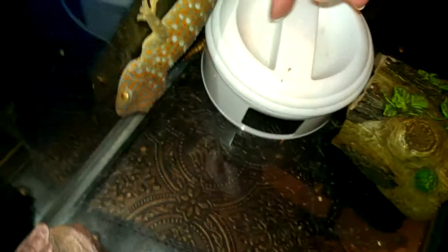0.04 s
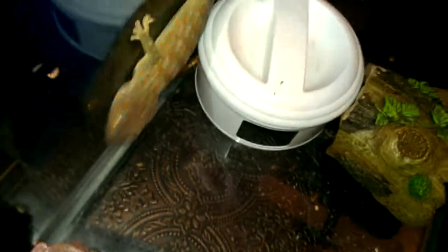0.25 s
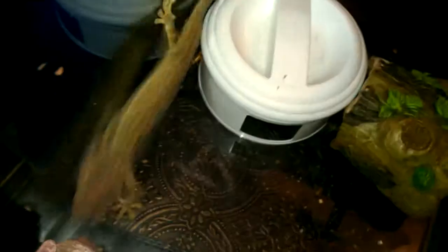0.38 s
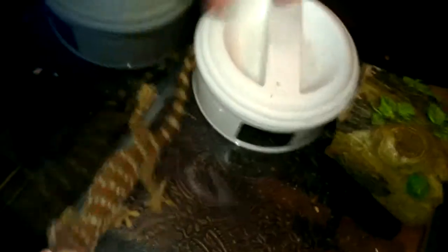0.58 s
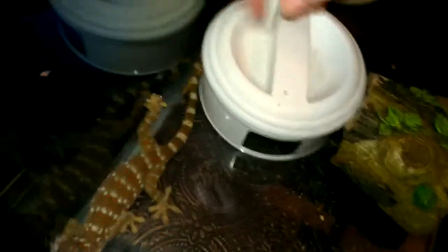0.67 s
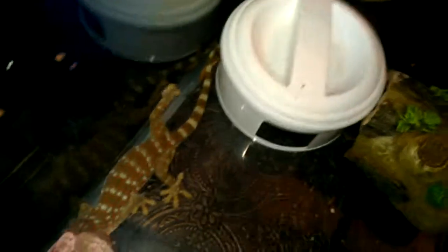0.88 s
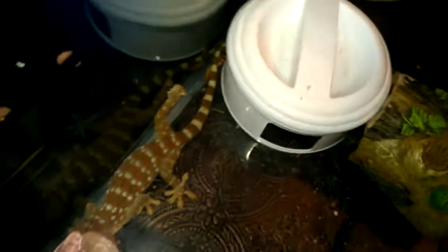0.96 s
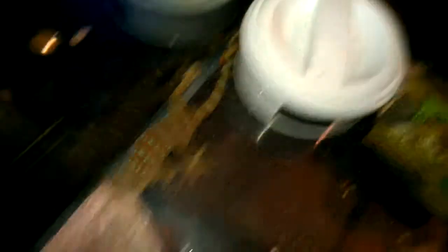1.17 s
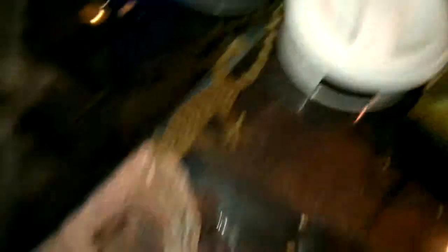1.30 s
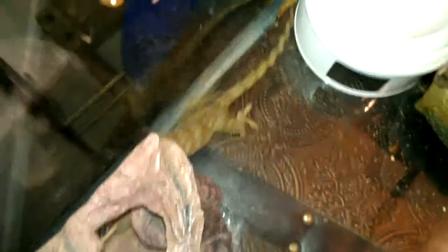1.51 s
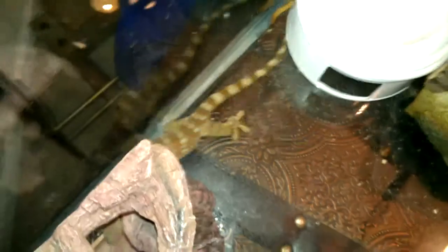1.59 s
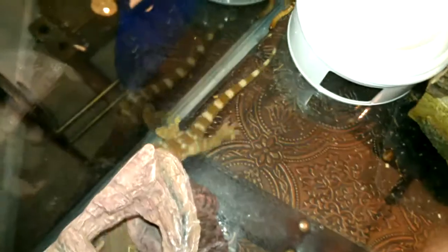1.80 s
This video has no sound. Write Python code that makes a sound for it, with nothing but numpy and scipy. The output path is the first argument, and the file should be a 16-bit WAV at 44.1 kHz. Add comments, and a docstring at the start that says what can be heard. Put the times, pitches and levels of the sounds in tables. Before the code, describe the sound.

Sudden close thumps and patter come from a gecko dashing through a glass tank, making the panels ring briefly with a deep boom. Its claws click, then it shuffles and taps softly over a faint indoor hum.

```python
"""A gecko leaps down inside a glass tank and scrambles along its floor, close to the microphone.
After a faint rumble, its landings make the panels thud and ring, and the tank sways with a deep boom.
Skin rustles as it slides, and claws snap against hard surfaces: both are shaped bursts of noise.
A few light taps follow, over the faint air and electrical hum of a quiet room."""
import sys
import numpy as np
from scipy import signal
from scipy.io import wavfile

SR = 44100
rng = np.random.default_rng(int(sys.argv[2]) if len(sys.argv) > 2 else 0)


def to_wav(sig):
    """Store sig (one row per channel, or 1-D mono) as 16-bit WAV at the path in sys.argv[1].

    Samples outside -1..1 are clipped; the rate is SR.
    """
    pcm = np.clip(np.atleast_2d(sig), -1, 1) * 32767
    pcm = np.round(pcm).astype(np.int16)
    wavfile.write(sys.argv[1], SR, pcm.T)  # frames by channels


N = 81585
TIME = np.arange(N) / SR

# Low thumps: a faint opening rumble, the gecko's landings, then a light tap. Each row: start in seconds,
# ring strength in dB, push length in ms, favoured ring pitch in Hz, thud level in dB, thud pitch in Hz,
# thud fade in seconds, share by which the thud starts too high, boom level in dB, thud pan in dB.
# Throughout, a "fade" is the time to drop by 60 dB, and "pan" is how much louder left is than right.
LOW_THUMPS = [(0.039, -90, 2.0, 169, -56, 165, 0.083, 0.22, -56, 4),
              (0.243, -26, 1.09, 730, -20.5, 178.5, 0.18, 0.45, -28.5, -2),
              (0.2602, -22.5, 1.8, 270, -42, 177, .09, 0.37, -40, -16),
              (0.2887, -31, 1.87, 456, -35, 169, 0.036, 0.18, -34.5, 1),
              (0.3351, -33.5, 1.42, 417, -21, 179, 0.11, 0.22, -27, 0),
              (0.441, -42.5, 1.24, 465, -20.5, 174.4, 0.19, 0.49, -34.5, 2.5),
              (0.477, -45.5, 1.05, 260, -21.5, 174, 0.12, 0.18, -32.5, 2.5),
              (0.52, -48.5, 1.2, 742, -31.5, 169.4, 0.15, 0.28, -58, 1),
              (0.580, -39, 1.66, 402, -24.5, 179.5, 0.28, 0.63, -35.5, 2.5),
              (0.633, -45, 4.4, 177, -31, 172.4, 0.16, 0.37, -55, 5),
              (1.2325, -65.5, 0.81, 269, -38, 212.4, 0.066, 0.92, -93, 31)]


def from_db(db):
    """Turn decibels into a number to multiply by."""
    return 10 ** (np.asarray(db) / 20)


def unit_level(x):
    """Scale a signal so that its average power is 1."""
    return x / np.sqrt(np.mean(x ** 2) + 1e-20)


def at_hz(points, hz):
    """Read between the rows of a table, with pitch spaced in octaves."""
    pitches, values = np.transpose(points)
    return np.interp(np.log(hz), np.log(pitches), values)


def pan(db):
    """Share a sound between left and right, keeping its total power."""
    return unit_level(from_db([[db / 2], [-db / 2]]))


def dying(age, fade_s):
    """Silent before age zero, then falling from 1 by 60 dB every fade_s seconds."""
    return (age >= 0) * np.exp(-np.log(1000) * np.maximum(age, 0) / fade_s)


def noise_bands():
    """Split stereo hiss into bands a third of an octave wide; return their centres and the bands."""
    # How alike the two sides are. Each row: pitch in Hz, likeness from -1 (opposite) to 1 (the same).
    likeness = [(60, 0.93), (250, 0.27), (700, 0.47), (1200, -0.36), (2000, 0.02), (3500, -0.082),
                (5200, -0.14), (10000, -0.02)]
    # The balance at the microphone. Each row: pitch in Hz, pan in dB.
    balance = [(1000, -0.5), (2500, 0.5), (4500, 2.5), (8000, -2), (13000, -1.5)]
    edges = 22 * 2 ** (np.arange(30) / 3)
    centres = np.sqrt(edges[1:] * edges[:-1])
    hiss = rng.standard_normal((2, 2, N + SR // 4))
    bands = []
    for k, hz in enumerate(centres):
        band_filter = signal.butter(2, edges[k:k + 2], "band", fs=SR, output="sos")
        mid, side = signal.sosfilt(band_filter, hiss[k % 2])[:, -N:]
        alike = np.clip(at_hz(likeness, hz), -.99, .99)
        stereo = np.sqrt(1 + alike) * mid + np.sqrt(1 - alike) * side * [[1], [-1]]
        bands.append(pan(at_hz(balance, hz)) * stereo)
    return centres, np.array(bands)


def mix_bands(bands, gains):
    """Blend the bands into one noise with an average power of 1."""
    return unit_level(np.tensordot(gains, bands, 1))


def room():
    """Quiet air makes a soft noise, and mains electricity adds a steady hum."""
    # The tone of the air. Each row: pitch in Hz, relative level in dB.
    air_tone = [(25, -41), (40, -52), (60, 4), (95, -4.5), (200, -6.5), (340, -18), (700, -14.5),
                (1400, -23), (3700, -25.5), (5400, -22.5), (6900, -27), (14000, -28.5)]
    # The notes of the hum. Each row: pitch in Hz, average level in dB.
    hum_notes = [(59.5, -69), (179.5, -65), (239, -75)]
    centres, bands = noise_bands()
    air = from_db(-64) * mix_bands(bands, from_db(at_hz(air_tone, centres)))
    hum = sum(from_db(db) * np.sqrt(2) * np.sin(2 * np.pi * (hz * TIME + rng.random()))
              for hz, db in hum_notes)
    return air + hum


def thuds():
    """Each thump has a short, round note that starts high and drops, as when a panel bends."""
    rise_share, settle_s = 0.057, 0.0133  # rise time as a share of the fade; time for the pitch to settle
    out = 0
    for start, _, _, _, db, hz, fade_s, sharp, _, pan_db in LOW_THUMPS:
        age = np.maximum(TIME - start, 0)
        cycles = hz * (age + sharp * settle_s * (1 - np.exp(-age / settle_s)))
        loudness = (1 - np.exp(-age / (rise_share * fade_s))) * dying(age, fade_s)
        out = out + from_db(db) * pan(pan_db) * loudness * np.sin(2 * np.pi * cycles)
    return out


def boom():
    """Every thump feeds one deep note, the pitch at which the whole tank sways."""
    hz, rise_s, fade_s = 51.9, 0.0081, .55
    tail_db, tail_fade_s = -20, 1.84
    energy = 0
    for start, *_, db, _ in LOW_THUMPS:
        age = np.maximum(TIME - start, 0)
        fall = np.hypot(dying(age, fade_s), from_db(tail_db) * dying(age, tail_fade_s))
        energy = energy + (from_db(db) * (1 - np.exp(-age / rise_s)) * fall) ** 2
    return pan(db=3) * np.sqrt(energy) * np.sin(2 * np.pi * hz * TIME)


def ring(force, hz, fade_s):
    """Each push starts a pure note that dies away."""
    decay = np.exp(-np.log(1000) / (fade_s * SR))
    turn = 2 * np.pi * hz / SR
    return signal.lfilter([0, np.sin(turn)], [1, -2 * decay * np.cos(turn), decay * decay], force + 1e-18)


def panel_ringing():
    """Soft pushes set the panels ringing; a longer push sounds duller."""
    # The tank's natural notes. Each row: pitch in Hz, relative level in dB, fade in seconds, pan in dB.
    notes = [(143.9, 3.5, 0.33, 2), (171.3, 3.5, 0.29, 3), (203.6, -6, 0.41, 10), (261.4, -13.5, 0.63, 1),
             (294.5, -9, 0.39, 5), (404, -19.5, 0.51, 28), (440, -3.5, 0.27, 10.5), (462.4, -12.5, 0.3, 10),
             (616, -19.5, 0.49, -32), (728, -7.5, 0.31, -1), (767, -24, 0.32, 2), (993, -8.5, 0.15, -4),
             (1215, 1, 0.096, 0), (1560, 4.5, 0.056, 8)]
    spot_db, spot_octaves = 10.5, 0.23  # each push boosts the notes near its favoured pitch
    pushes = []
    for start, db, push_ms, *_ in LOW_THUMPS:
        peak_s = push_ms / 4000  # the push peaks a quarter of the way through
        progress = np.maximum(TIME - start, 0) / peak_s
        push = progress * np.exp(-progress)
        pushes.append(from_db(db) * push / push.sum())
    spots = np.array([spot_hz for _, _, _, spot_hz, *_ in LOW_THUMPS])
    out = 0
    for hz, db, fade_s, pan_db in notes:
        favour = from_db(spot_db * np.exp(-(np.log2(hz / spots) / spot_octaves) ** 2))
        out = out + from_db(db) * pan(pan_db) * ring(favour @ np.array(pushes), hz, fade_s)
    return out


def skin_rustle(centres, bands):
    """Scales catch and slip, so each slide is a grainy hiss that swells and dies away."""
    # Skin and feet slide over the surfaces. Each row: time of the peak in seconds, level in dB,
    # rise in seconds, fall in seconds, pan in dB.
    slides = [(0.057, -66, 0.0068, 0.022, -14), (0.136, -60.5, 0.016, 0.023, 0),
              (0.205, -65.5, 0.022, 0.09, -0.5), (0.347, -47.5, 0.019, 0.043, 2),
              (0.456, -52.5, 0.034, 0.063, 7.5), (0.540, -59, 0.075, 0.068, 2),
              (0.670, -58, 0.12, 0.072, -0.5), (0.836, -62, 0.051, 0.056, -1),
              (1.405, -64, 0.026, 0.089, 2), (1.482, -60.5, 0.044, 0.096, 2),
              (1.586, -60.5, 0.033, 0.057, 0.5), (1.802, -64, 0.013, 0.035, 1)]
    # The tone of the rustle. Each row: pitch in Hz, relative level in dB.
    rustle_tone = [(200, -3.5), (650, -5.5), (1200, -4), (2200, -6), (3400, -2), (5200, 0.5), (7000, -6.5),
                   (10000, -5.5), (14000, -9.5)]
    grain_db, grains_per_s = 1.5, 230
    power = 0
    for peak, db, rise_s, fall_s, pan_db in slides:
        age = TIME - peak
        swell = np.exp(np.where(age < 0, -(age / rise_s) ** 2, -age / fall_s))
        power = power + (from_db(db) * pan(pan_db) * swell) ** 2
    flicker = np.interp(TIME * grains_per_s, np.arange(N), rng.standard_normal(N))
    grains = unit_level(from_db(grain_db * flicker))
    return np.sqrt(power) * grains * mix_bands(bands, from_db(at_hz(rustle_tone, centres)))


def knocks(centres, bands):
    """Each hard hit wakes many brief notes at once, made here as noise, and a faint room echo."""
    # Hits of claws, tail and furnishings. Each row: start in seconds, level in dB, centre pitch in Hz,
    # width in octaves, fade in seconds, pan in dB.
    hits = [(0.13, -51, 4220, 0.48, 0.067, -1), (0.24, -30.5, 3160, 1.18, 0.075, 0),
            (0.24, -34.5, 860, 1.14, 0.17, 1), (0.3315, -28.5, 700, 0.42, 0.051, -2.5),
            (0.34, -48, 1870, 0.21, 0.1, 3), (0.36, -45.5, 3200, 1.2, 0.09, 10),
            (0.457, -43.5, 3230, 0.79, 0.11, 5), (0.44, -46.5, 558, 0.49, 0.32, 1.5),
            (0.5195, -44, 706, 0.29, 0.052, 7), (0.57, -35, 3160, 0.86, 0.049, -15),
            (0.56, -47, 640, 0.88, 0.22, -2), (0.5845, -25, 4970, 0.46, 0.058, 3.5),
            (0.58, -27.5, 2810, 0.47, 0.053, 8), (0.5842, -40, 9500, 1.3, 0.012, -1),
            (0.584, -45, 424, 0.21, 0.15, 18), (0.635, -56.5, 630, 0.29, 0.37, 1),
            (1.2334, -46.5, 603, 1.66, 0.03, 27), (1.4027, -47.5, 1180, 0.74, 0.052, 1.5),
            (1.424, -63.5, 650, 0.13, 0.15, -2), (1.796, -59, 1710, .45, 0.13, 0),
            (1.239, -52.5, 268, 0.34, 0.085, 12), (1.474, -53.5, 4200, 0.36, .04, 2),
            (1.584, -56.5, 4400, 0.54, 0.053, 12), (1.566, -65, 700, .8, 0.14, 2)]
    rise_s, echo_db, echo_fade_s = 0.0019, -14.5, 0.13
    steepness = 1.64  # how fast the noise weakens away from its centre pitch
    out = np.zeros((2, N))
    for start, db, hz, octaves, fade_s, pan_db in hits:
        age = TIME - start
        tone = (1 + (np.log2(centres / hz) / octaves) ** 2) ** -steepness
        noise = np.roll(mix_bands(bands, tone), rng.integers(N), axis=1)
        rise = np.clip(age / rise_s, 0, 1)
        fall = np.hypot(dying(age, fade_s), from_db(echo_db) * dying(age, echo_fade_s))
        out += from_db(db) * pan(pan_db) * rise * fall * noise
    return out


def glass_colour(sound):
    """The glass rings along with knocks and slides, changing the level of a few narrow bands."""
    # The bands the glass responds to. Each row: pitch in Hz, width in Hz, boost in dB (below 0 is a cut).
    resonances = [(399, 19, 14), (715, 120, 7), (994, 12, 3.5), (1571, 23, 7.5), (2450, 16, 5),
                  (3150, 42, -1.5), (3074, 26, 6), (3980, 16, 6.5), (5076, 79, 5.5), (5400, 20, 8.5),
                  (5930, 110, 3)]
    out = sound
    for hz, width_hz, db in resonances:
        decay = np.exp(-np.pi * width_hz / SR)
        feedback = [1, -2 * decay * np.cos(2 * np.pi * hz / SR), decay * decay]
        band = (1 - decay * decay) / 2 * signal.lfilter([1, 0, -1], feedback, sound + 1e-18)
        out = out + (from_db(db) - 1) * band
    return out


def scene():
    """The gecko's dash through the tank, over the quiet room."""
    centres, bands = noise_bands()
    contacts = glass_colour(knocks(centres, bands) + skin_rustle(centres, bands))
    bass_cut = signal.butter(4, 129.5, "high", fs=SR, output="sos")  # panels give off little deep bass
    panels = signal.sosfilt(bass_cut, thuds() + panel_ringing())
    return room() + panels + boom() + contacts


def record(dry):
    """Cut the highest treble steeply."""
    cutoff_hz = 14200
    return signal.sosfilt(signal.ellip(10, .2, 80, cutoff_hz, fs=SR, output="sos"), dry)


dry = scene()
out = record(dry)
to_wav(out)
```